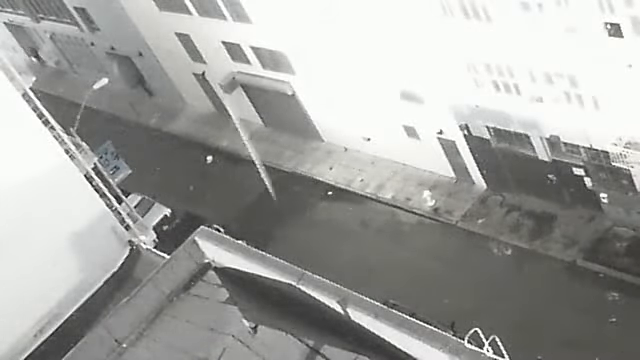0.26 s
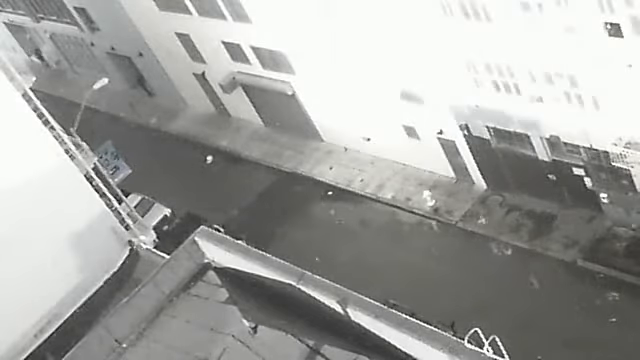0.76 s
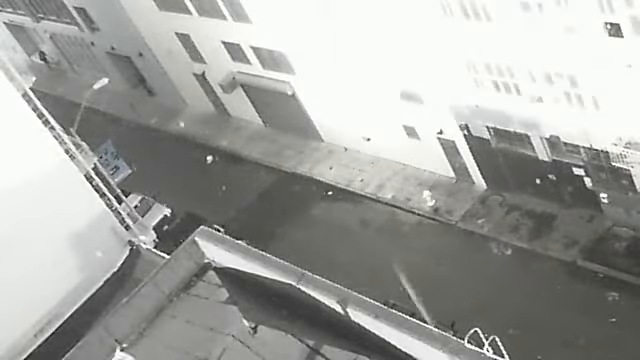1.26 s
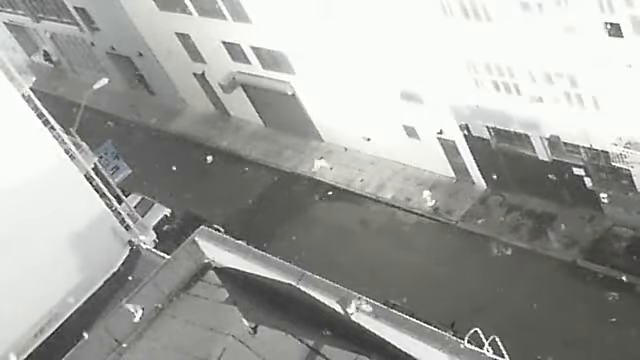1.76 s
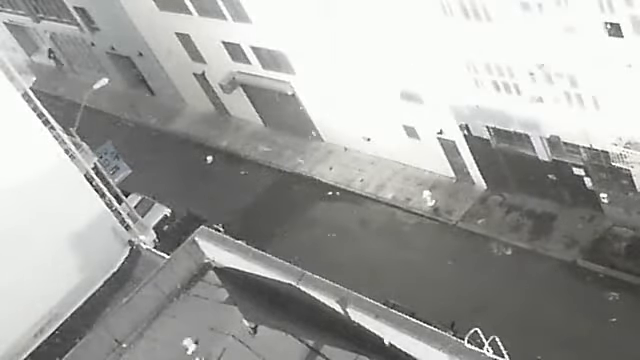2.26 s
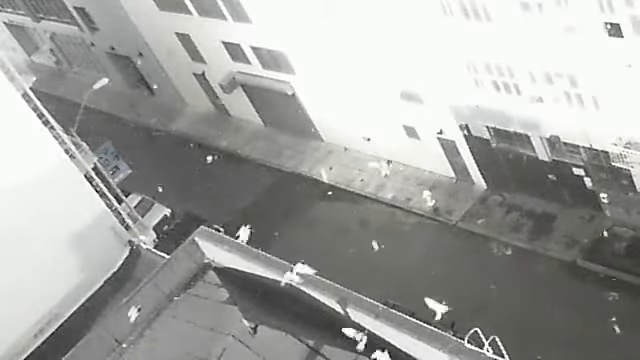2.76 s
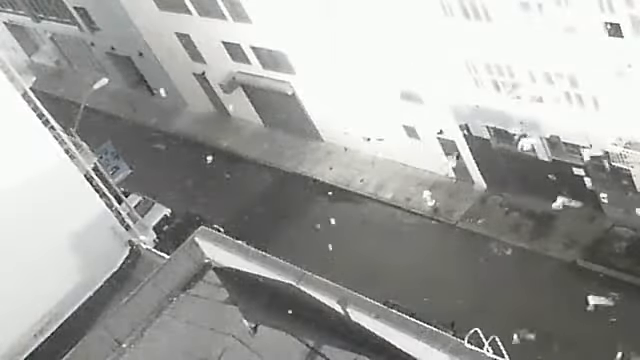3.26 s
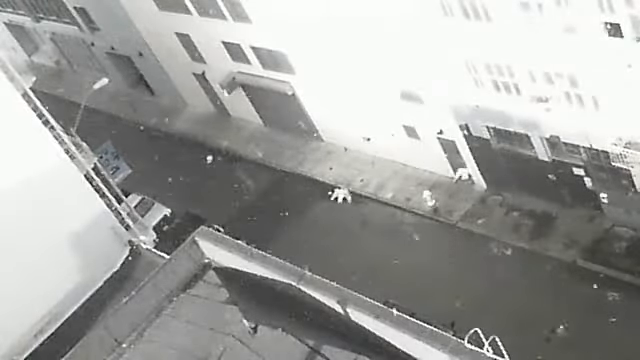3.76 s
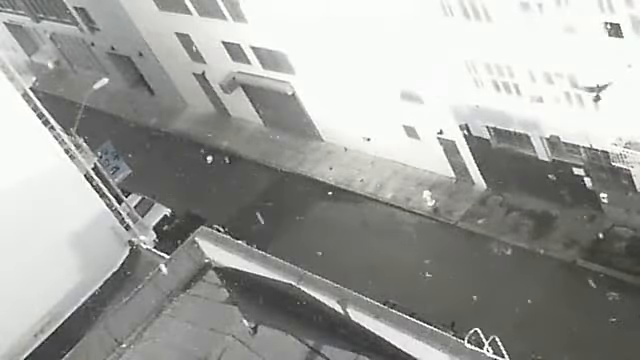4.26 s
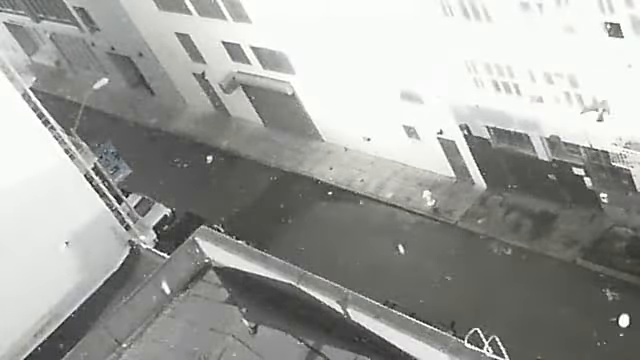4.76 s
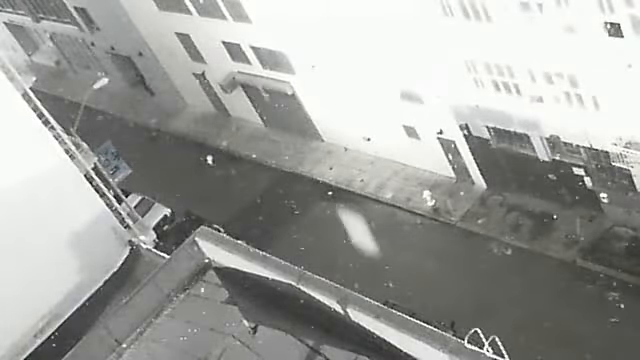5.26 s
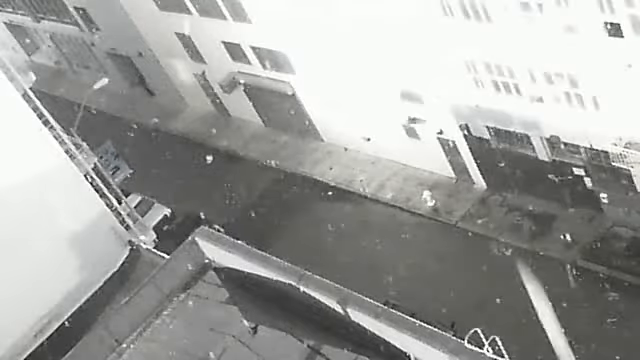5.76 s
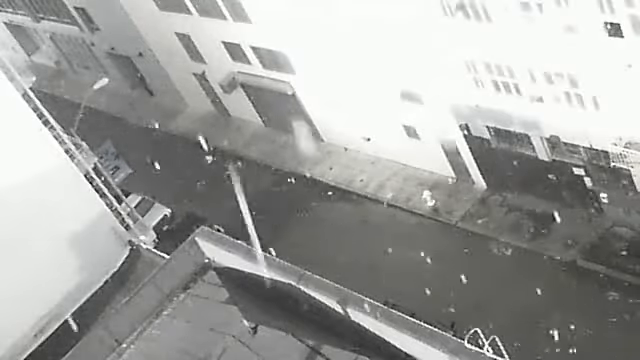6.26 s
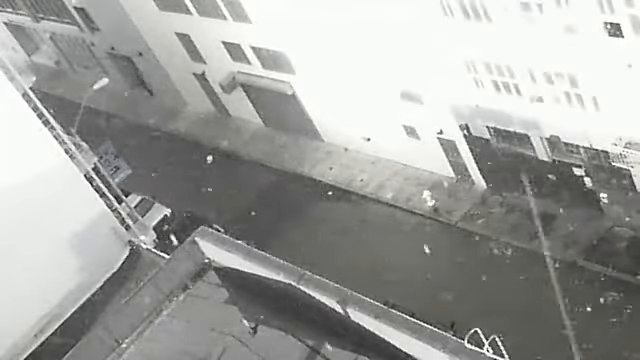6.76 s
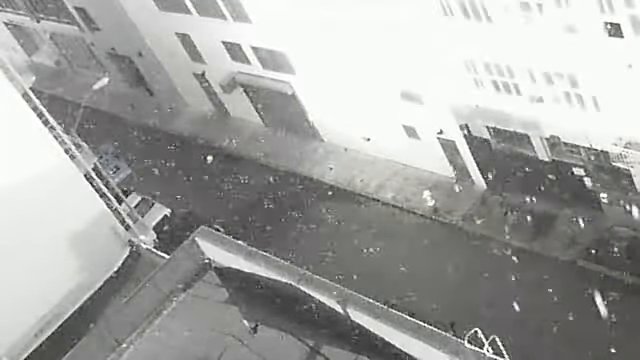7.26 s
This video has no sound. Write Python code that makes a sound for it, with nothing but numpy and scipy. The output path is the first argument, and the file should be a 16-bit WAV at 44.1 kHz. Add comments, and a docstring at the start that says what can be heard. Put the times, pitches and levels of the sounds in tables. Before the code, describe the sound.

Hail thickens over a narrow city street, fine ticking and roof patter growing denser as sharp stone cracks multiply, with gusty low wind rumbling on the microphone.

```python
"""Hail thickens over a narrow city street, heard from a roof terrace through one microphone.
From the start, random pellet impacts tick on pavement and patter on roofs, over filtered-noise far traffic and breeze.
Larger stones crack as noise bursts with struck modes; gusts and eddies rumble as pressure on the microphone.
Two faint decaying sines sound in the distance after about half a second.
From about 4 s, metal pings as clusters of close modes and hollow covers thud as low noise bursts."""
import sys
import numpy as np
from scipy import signal
from scipy.fft import rfft, irfft, next_fast_len
from scipy.io import wavfile

SR = 44100
rng = np.random.default_rng(int(sys.argv[2]) if len(sys.argv) > 2 else 0)


def bounce(signal):
    """Save signal as a 16-bit WAV file at the path given by the first command-line argument."""
    frames = np.transpose(np.atleast_2d(signal))
    limited = np.clip(frames, -1, 1)
    pcm = np.round(limited * 32767).astype(np.int16)
    wavfile.write(sys.argv[1], SR, pcm)


N = 331191  # length in samples


def from_db(db):
    """Level to amplitude: 20 dB is a factor of ten."""
    return 10 ** (np.asarray(db) / 20)


def rms_one(x):
    """Normalisation to unit root-mean-square amplitude."""
    return x / np.sqrt(np.mean(x ** 2) + 1e-20)


def in_time(rows):
    """Linear interpolation of each column of a curve at every sample."""
    s, *columns = np.transpose(rows)
    return [np.interp(np.arange(N) / SR, s, column) for column in columns]


def coloured(x, spectrum):
    """Linear filtering: the spectrum is multiplied by a smooth gain curve; rms 1."""
    hz, db = np.transpose(spectrum)
    size = next_fast_len(N)
    bins = np.maximum(np.fft.rfftfreq(size, 1 / SR), 1)
    gain = from_db(np.interp(np.log(bins), np.log(hz), db))
    return rms_one(irfft(rfft(x, size) * gain, size)[:N])


def noise(spectrum):
    """Coloured noise: a white random process after linear filtering; rms 1."""
    return coloured(rng.standard_normal(N), spectrum)


def drift(rate):
    """Low-passed random process of rms 1, changing about rate times a second."""
    size = next_fast_len(N)
    bins = np.fft.rfftfreq(size, 1 / SR)
    lowpass = 1 / (1 + (bins / rate) ** 2)
    return rms_one(irfft(rfft(rng.standard_normal(size)) * lowpass)[:N])


def decay(t, t60):
    """Exponential damping: the amplitude falls by 60 dB in t60 seconds."""
    return np.exp(-np.log(1000) * t / t60)


def burst(rise_s, t60):
    """Impact envelope: a quick rise, then exponential damping; top 1."""
    t = np.arange(SR // 3) / SR
    shape = (1 - np.exp(-t / rise_s)) * decay(t, t60)
    return shape / shape.max()


def add(track, s, sound):
    """Superposition: a sound is summed into a track from time s."""
    at = int(np.clip(round(s * SR), 0, N - 1))
    track[at:at + len(sound)] += sound[:N - at]


def landings(per_s, spread_db, largest):
    """Random point process: independent impacts, many small and few large."""
    sizes = from_db(spread_db * np.minimum(rng.exponential(1, N), largest))
    return sizes * rng.choice([-1, 1], N) * (rng.random(N) < per_s / SR)


def surfaces(clicks, low_hz, high_hz, cycles, scatter_t60, scatter_db, count):
    """Impulse response by convolution: each surface has one damped mode and a diffuse tail."""
    out, dealt = np.zeros(N), rng.integers(0, count, N)
    t = np.arange(SR // 8) / SR
    for k, hz in enumerate(np.geomspace(low_hz, high_hz, count)):
        ring = np.sin(2 * np.pi * hz * t) * decay(t, cycles / hz)  # 60 dB down after this many cycles
        scatter = rng.standard_normal(len(t)) * decay(t, scatter_t60)
        response = rms_one(ring) + from_db(scatter_db) * rms_one(scatter)
        out += signal.oaconvolve(clicks * (dealt == k), response)[:N]
    return out


# heaviness of the shower, before the mix: t/s, roof patter level/dB, pavement ticking level/dB
SHOWER_LEVELS = [(0, -35.5, -36), (1.2, -36, -34), (2.3, -35, -33.5), (3.5, -34.5, -31.5),
                 (4.6, -32.5, -31.5), (5.5, -32.5, -30.5), (6.2, -31.5, -29.5), (7.51, -32, -30)]
# spectrum of roof patter: f/Hz, relative level/dB
PATTER_SPECTRUM = [(200, -19), (370, -9.5), (520, -6.5), (660, -2.5), (870, -2), (990, 0.5), (1100, -0.8),
                   (1250, -4.5), (1600, -4.5), (2200, -10), (3200, -15.5), (5000, -16), (10000, -45)]
# spectrum of pavement ticking: f/Hz, relative level/dB
TICKING_SPECTRUM = [(1500, -28.5), (2600, -9.5), (3550, -12), (3850, -7.5), (4500, -7), (5250, -7.5),
                    (6100, -1.5), (6600, -0.5), (7050, 3), (7900, 2), (8400, 0.5), (9200, -0.4),
                    (9700, -2.5), (10300, -12)]


def shower():
    """Superposed impacts: dense ones merge into a noise wash, nearer ones stand out as ticks and knocks."""
    patter_db, tick_db = in_time(SHOWER_LEVELS)
    pellets = landings(per_s=420, spread_db=3.0, largest=2.26)
    grit = landings(per_s=1200, spread_db=1.0, largest=3.3)
    on_roofs = landings(per_s=360, spread_db=3.5, largest=2.66)

    ticks = surfaces(pellets, 2600, 10050, cycles=490, scatter_t60=0.064, scatter_db=1.0, count=30)
    fizz = surfaces(grit, 2320, 10500, cycles=7, scatter_t60=0.0078, scatter_db=-2, count=12)
    knocks = surfaces(on_roofs, 551, 3250, cycles=20.6, scatter_t60=0.052, scatter_db=0.0, count=24)

    pavement = from_db(-5.0) * coloured(ticks, TICKING_SPECTRUM)
    pavement += from_db(-8.5) * coloured(fizz, TICKING_SPECTRUM)
    pavement += from_db(-2.0) * noise(TICKING_SPECTRUM)
    roofs = from_db(-6.5) * coloured(knocks, PATTER_SPECTRUM)
    roofs += from_db(-1.0) * noise(PATTER_SPECTRUM)
    return from_db(tick_db) * pavement + from_db(patter_db) * roofs


# spectrum of far traffic: f/Hz, relative level/dB
TRAFFIC_SPECTRUM = [(20, -0.5), (50, -8), (100, -18), (170, -6), (280, -3), (450, -7), (900, -8),
                    (3000, -49)]


def traffic():
    """Stationary noise: far traffic has a fixed low spectrum and a steady level."""
    return from_db(-46.5) * noise(TRAFFIC_SPECTRUM)


LULL_DB, LULL_RISE_DB_PER_S = -46, 0.73  # the breeze between gusts freshens with the shower
GUST_SWELL_SHARE, GUST_RELEASE_S = 0.23, 0.1  # share of length to build up; time constant of the fall
# gusts on the microphone: start t/s, length t/s, rumble level/dB
GUSTS_IN_TIME = [(0.36, 0.73, -33.5), (1.45, 0.15, -33.5), (2.25, 0.5, -41), (2.72, 0.19, -31.5),
                 (2.92, 0.62, -32.5), (3.42, 0.48, -29.5), (3.97, 0.23, -30), (4.38, 0.68, -36),
                 (5.307, 0.075, -39), (5.6, 0.11, -36), (6.12, 0.22, -41), (6.38, 0.61, -33),
                 (6.9, 0.61, -28)]


def gust_strength():
    """Incoherent addition: the powers of swelling, holding and dying gusts add to that of the breeze."""
    t = np.arange(N) / SR
    power = from_db(LULL_DB + LULL_RISE_DB_PER_S * t) ** 2
    for s, length, level_db in GUSTS_IN_TIME:
        swell = np.clip((t - s) / (GUST_SWELL_SHARE * length), 0, 1)
        fade = np.exp(-np.maximum(t - s - length, 0) / GUST_RELEASE_S)
        power = power + (from_db(level_db) * swell * fade) ** 2
    return np.sqrt(power)


# spectrum of wind rumble before its last tilt: f/Hz, relative level/dB
WIND_SPECTRUM = [(8, 1), (18, 1.5), (32, -1), (50, -3.5), (80, -9.5), (120, -13.5), (170, -23),
                 (300, -34.5), (800, -73)]


def wind(lump_db=2.0):
    """Turbulent pressure: low noise, randomly modulated into lumps, follows the gust strength."""
    lumps = noise(WIND_SPECTRUM) * from_db(lump_db * drift(5.3))
    tilt = [(4, -5), (14, 2.5), (1000, -2)]  # f/Hz, relative level/dB
    return gust_strength() * coloured(lumps, tilt)


def ringing(hz, t60, width_hz):
    """Modal superposition: five close modes are struck together; height about 1."""
    t = np.arange(SR // 3) / SR
    pitches = hz + width_hz * (np.linspace(-1, 1, 5) + rng.uniform(-0.17, 0.15, 5))
    modes = np.sin(2 * np.pi * (pitches[:, None] * t + rng.random((5, 1))))
    return modes.sum(axis=0) / np.sqrt(5 / 2) * burst(0.0008, t60)


SMALL_STONES_PER_S, SMALL_SPREAD_DB = 7, 2  # levels spread evenly to either side by this much
SMALL_CRACK_DB, SMALL_KNOCK_DB = 8, 3.5  # over the pavement ticking, over the roof patter
SMALL_LOW_HZ, SMALL_HIGH_HZ = 6780, 9430  # range of crack pitch
KNOCK_LOW_HZ, KNOCK_HIGH_HZ = 1100, 1700  # range of knock pitch


def small_stones():
    """Stratified random arrivals: one stone in each equal slot, as loud as the shower is heavy."""
    count = int(SMALL_STONES_PER_S * N / SR)
    when, pitch, surface, crack, knock = rng.random((count, 5)).T
    s = (np.arange(count) + when) * N / SR / count
    patter_db, tick_db = (level[(s * SR).astype(int)] for level in in_time(SHOWER_LEVELS))
    crack_db = tick_db + SMALL_CRACK_DB + SMALL_SPREAD_DB * (2 * crack - 1)
    knock_db = patter_db + SMALL_KNOCK_DB + SMALL_SPREAD_DB * (2 * knock - 1)
    crack_hz = SMALL_LOW_HZ + pitch * (SMALL_HIGH_HZ - SMALL_LOW_HZ)
    knock_hz = KNOCK_LOW_HZ + surface * (KNOCK_HIGH_HZ - KNOCK_LOW_HZ)
    return np.transpose([s, crack_db, knock_db, crack_hz, knock_hz])


CRACK_T60_S, KNOCK_T60_S = 0.037, 0.09
# big stones close by, before the mix: t/s, crack level/dB, knock level/dB, crack f/Hz, knock f/Hz
BIG_STONES = [(0.053, -22, -28, 7800, 1350), (0.1068, -23, -35, 7190, 1540), (0.5637, -20, -41, 8830, 1100),
              (0.6564, -21.5, -35, 7500, 1450), (1.647, -22, -40, 7900, 1750),
              (2.0992, -15, -35, 9030, 1440), (2.515, -25, -32, 7080, 1110),
              (2.9785, -15.5, -32, 7800, 1160), (3.318, -16.5, -28, 9260, 1170),
              (3.7282, -15.5, -27, 7620, 1330), (4.2194, -20, -39, 9300, 1260),
              (4.7491, -15.5, -21.5, 7800, 1600), (4.8746, -15.5, -35, 9550, 2060),
              (4.8947, -18, -31, 8850, 1460), (5.22, -14.5, -35, 7450, 1140),
              (5.2304, -22, -24.5, 9630, 1150), (5.3212, -18.5, -37, 7160, 1100),
              (5.5572, -19, -27, 6790, 1120), (5.655, -21, -30, 8060, 1190), (5.7712, -20, -25, 7410, 1500),
              (5.8297, -15, -31, 7250, 1630), (6.0319, -10.5, -23.5, 7680, 1610),
              (6.1586, -16.5, -25, 7220, 1180), (6.4076, -17, -23.5, 8860, 1154),
              (6.417, -22, -23, 7600, 1500), (6.64, -16, -28, 6300, 1070), (6.7872, -13.5, -21, 8390, 1360),
              (6.856, -18, -31, 8600, 1190), (6.8623, -16.5, -26, 6900, 1280),
              (7.0673, -16, -24.5, 7100, 1450), (7.104, -10, -22, 8460, 1350),
              (7.1886, -17.5, -34, 7130, 1700), (7.3831, -14, -20.5, 7660, 1615)]
# spectrum of the shattering noise: f/Hz, relative level/dB
CRACK_SPECTRUM = [(1500, -12), (2800, -16.5), (3600, -9.5), (5200, -7), (6200, -2.5), (7600, 0.5),
                  (9100, 1), (10500, -9.5)]
# spectrum of the knocking noise: f/Hz, relative level/dB
KNOCK_SPECTRUM = [(250, -8.5), (600, -1), (1000, 4), (1600, -0.5), (2400, -5), (4000, -16), (7000, -20)]


def stones(shard_db=1.5, tail_db=-19, tail_t60=0.47):
    """Impact excitation: shards spray noise, the struck body rings in modes, the street answers faintly."""
    crack, knock, rings = np.zeros(N), np.zeros(N), np.zeros(N)
    for s, crack_db, knock_db, crack_hz, knock_hz in [*BIG_STONES, *small_stones()]:
        street_tail = from_db(tail_db) * burst(0.019, tail_t60)
        add(crack, s, from_db(crack_db) * (burst(0.0022, CRACK_T60_S) + street_tail))
        add(knock, s, from_db(knock_db) * burst(0.0012, KNOCK_T60_S))
        add(rings, s, from_db(crack_db - 11) * ringing(crack_hz, CRACK_T60_S, width_hz=416))
        add(rings, s, from_db(knock_db - 9.5) * ringing(knock_hz, 0.11, width_hz=171))
    shards = rms_one(noise(CRACK_SPECTRUM) * from_db(shard_db * drift(300)))
    return from_db(-8.0) * crack * shards + from_db(-5.5) * knock * noise(KNOCK_SPECTRUM) + rings


# two far tones: start t/s, rise t/s, level/dB, starting f/Hz, sag in Hz/s, T60 t/s
DISTANT_TONES = [(0.48, 0.11, -36, 737, 150, 0.6), (0.53, 0.14, -43, 339, 2, 1.5)]


def far_tones(waver_hz=2.3, flutter_db=-0.5):
    """Frequency modulation: phase integrates a sagging, wavering pitch; the upper tone fades first."""
    out = np.zeros(N)
    t = np.arange(N) / SR
    for s, rise_s, level_db, hz, sag_hz_per_s, t60 in DISTANT_TONES:
        envelope = np.minimum(t / rise_s, 1) * decay(np.maximum(t - rise_s, 0), t60)
        pitch = hz - sag_hz_per_s * t + waver_hz * drift(25)
        tone = np.sin(2 * np.pi * np.cumsum(pitch) / SR)
        add(out, s, from_db(level_db + flutter_db * drift(12)) * envelope * tone)
    return out


# eddies that slap the microphone: t/s, level/dB before the pulse shape, length t/s
EDDIES = [(0.699, -25, 0.022), (.96, -30, 0.011), (3.605, -18, 0.022), (3.734, -20, 0.011),
          (3.796, -20, 0.018), (3.865, -22.5, 0.015), (4.012, -24, 0.016), (4.089, -23, 0.013),
          (7.081, -20, 0.016), (7.266, -15, 0.026), (7.362, -20, 0.014)]


def buffets():
    """Pressure pulse: a sharp eddy is one push and one pull on the microphone."""
    out = np.zeros(N)
    for s, level_db, length in EDDIES:
        phase = np.linspace(0, 2 * np.pi, int(length * SR))
        add(out, s, from_db(level_db) * np.sin(phase) * np.sin(phase / 2))
    return out


# stones that ping off railings and gutters: t/s, level/dB, f/Hz
METAL_PINGS = [(3.986, -35, 2900), (3.986, -34, 3940), (4.982, -29.5, 1740), (6.646, -34, 4500),
               (6.953, -32, 2200), (7.192, -26, 1680)]


def pings(ring_t60=0.067):
    """Modal resonance: struck metal rings in a narrow cluster of modes, longer than a stone's crack."""
    out = np.zeros(N)
    for s, level_db, hz in METAL_PINGS:
        add(out, s, from_db(level_db) * ringing(hz, ring_t60, width_hz=34))
    return out


# stones on hollow covers: t/s, level/dB
COVER_BLOWS = [(4.068, -39), (5.053, -33), (5.622, -33), (5.655, -34.5), (6.03, -39), (6.42, -40),
               (6.86, -37), (7.1, -33), (7.385, -43)]
# spectrum of a hollow cover: f/Hz, relative level/dB
COVER_SPECTRUM = [(60, -12), (120, 4), (220, 0), (400, 1), (700, -5), (1400, -22.5)]


def thuds():
    """Damped cavity response: hollow covers answer a stone with a short low boom of noise."""
    blows = np.zeros(N)
    for s, level_db in COVER_BLOWS:
        add(blows, s, from_db(level_db) * burst(0.0057, 0.1))
    return blows * noise(COVER_SPECTRUM)


def scene():
    """Linear superposition at one microphone, which feeds both channels."""
    mono = shower() + traffic() + wind() + stones() + far_tones() + buffets() + pings() + thuds()
    return np.array([mono, mono])


CUTOFF_HZ = 10330


def record(dry):
    """Band limitation: a steep elliptic low-pass cuts the top."""
    lowpass = signal.ellip(12, .1, 90, CUTOFF_HZ, fs=SR, output="sos")  # ripple and stopband in dB
    return signal.sosfilt(lowpass, dry)


dry = scene()
out = record(dry)
bounce(out)
```